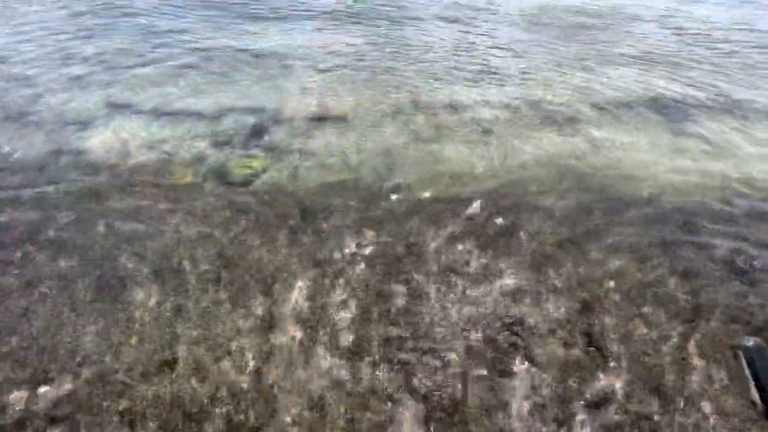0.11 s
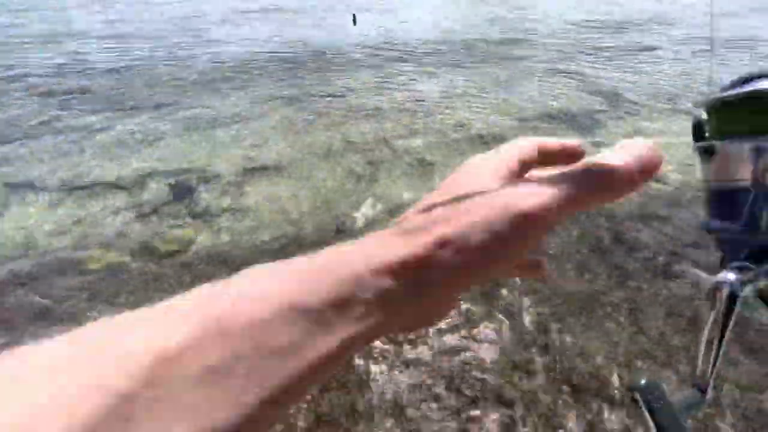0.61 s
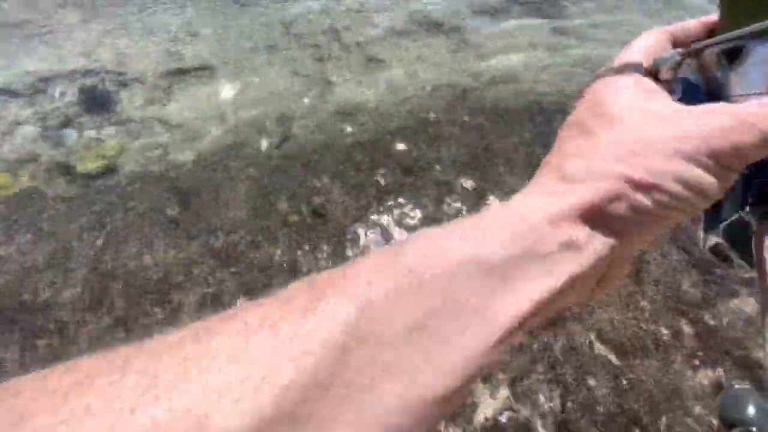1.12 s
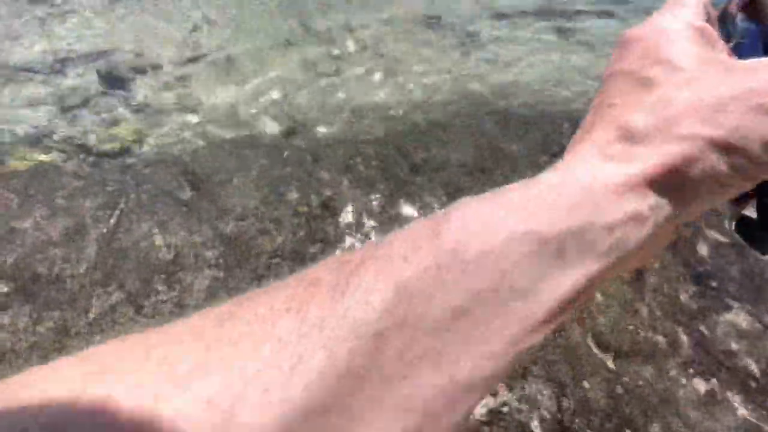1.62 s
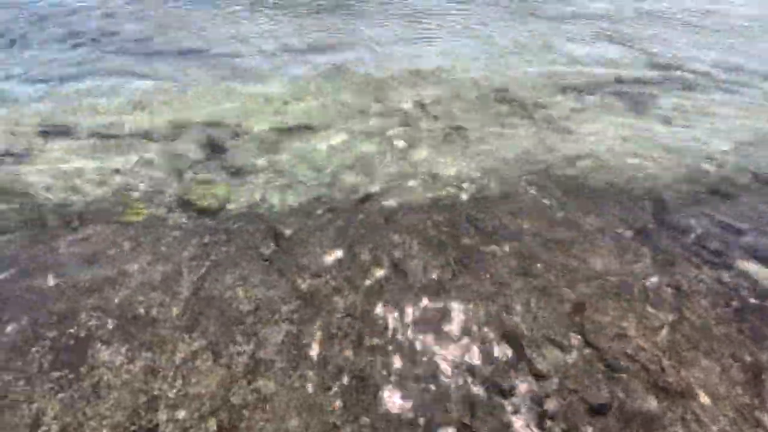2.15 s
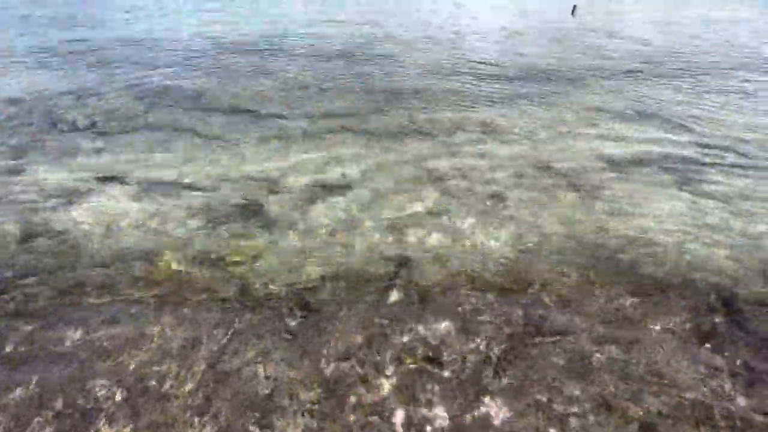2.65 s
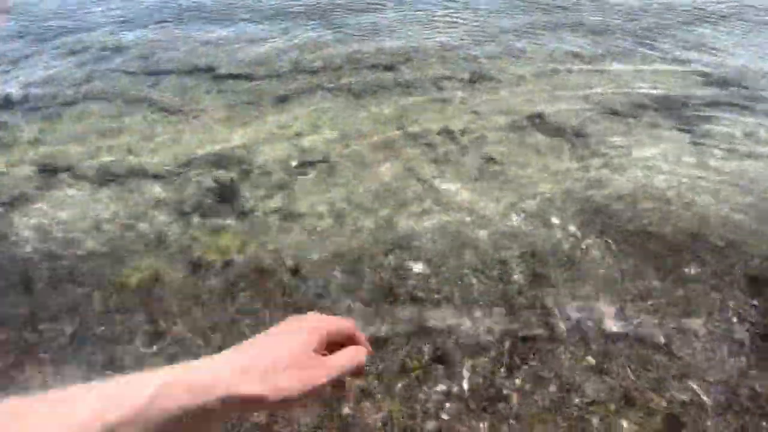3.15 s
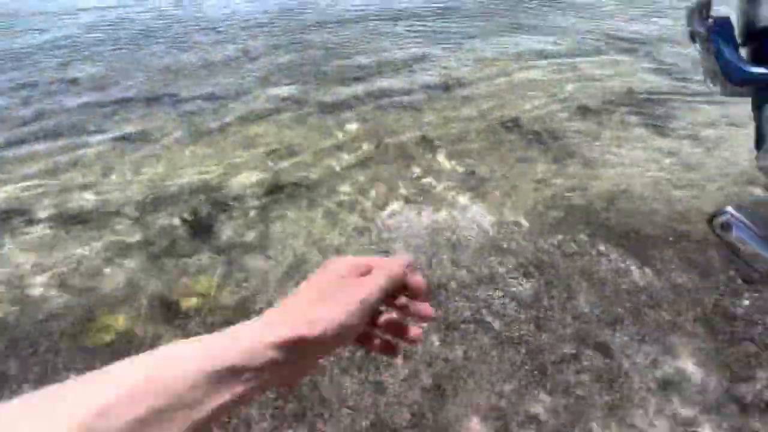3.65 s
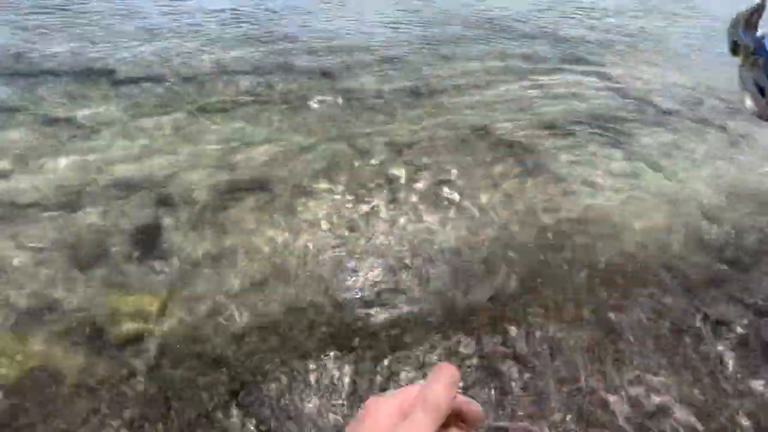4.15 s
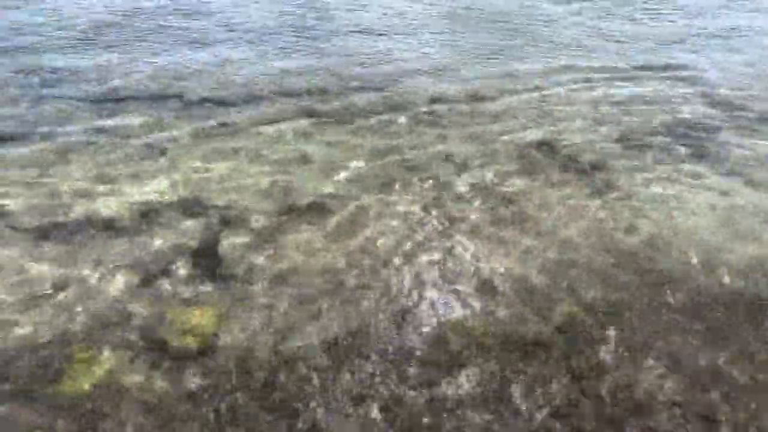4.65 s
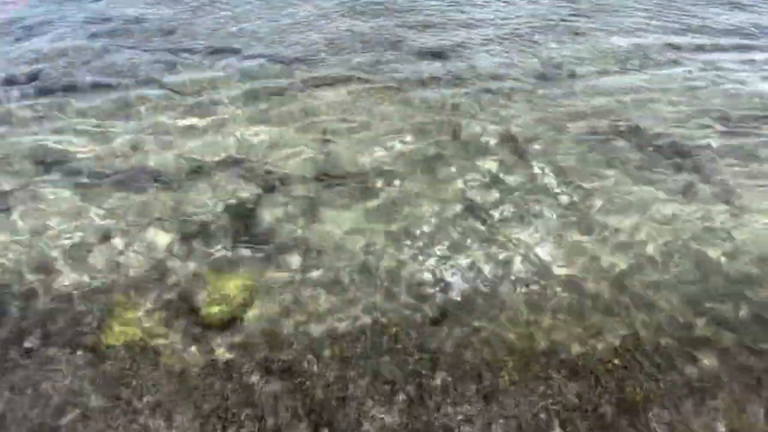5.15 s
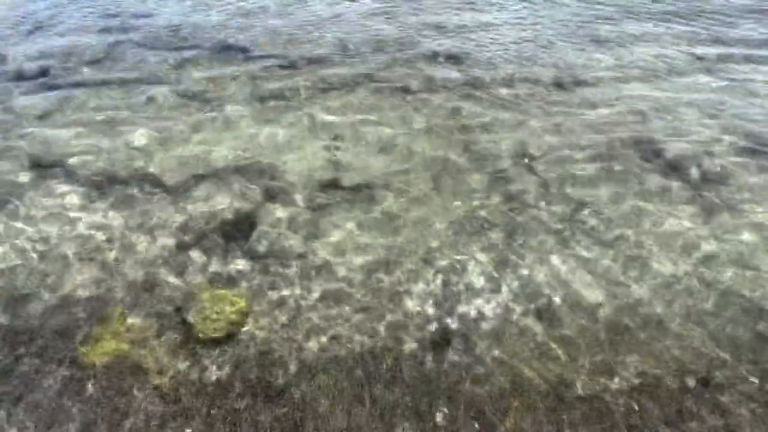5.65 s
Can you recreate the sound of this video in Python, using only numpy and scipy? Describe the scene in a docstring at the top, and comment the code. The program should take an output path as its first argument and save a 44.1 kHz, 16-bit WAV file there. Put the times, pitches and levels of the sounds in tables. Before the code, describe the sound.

Someone wades over rocks: a brief splash, a lull of smooth wash, then stronger bubbly sloshes with low wind buffeting.

```python
"""A shallow, rocky seashore: feet wade through the water, heard by a small two-port microphone.
The water gurgles and fizzes (swarms of ringing bubbles over shaped hiss), traps pockets of air
(gliding sines) and flings drops (puffs of noise). Small surf washes further out (smooth hiss),
and gusts buffet the ports (lumpy low noise, a wandering moan and a few falling thumps)."""
import sys
import numpy as np
from scipy import signal
from scipy.fft import rfft, irfft, next_fast_len
from scipy.io import wavfile
from scipy.ndimage import uniform_filter1d

SR = 44100
rng = np.random.default_rng(int(sys.argv[2]) if len(sys.argv) > 2 else 0)


def digitize_waveform(pressure):
    """Quantize a signal to 16-bit integers and store it at the path in sys.argv[1].

    Rows of a 2-D input are taken as channels; values are limited to [-1, 1].
    """
    field = np.atleast_2d(pressure).T
    bounded = np.clip(field, -1, 1)
    quanta = np.round(bounded * 32767).astype(np.int16)
    wavfile.write(sys.argv[1], SR, quanta)


def invert_db(level):
    """Linear amplitude ratio for a level in decibels (20 dB per decade), elementwise."""
    return 10 ** (np.asarray(level, dtype=float) / 20)


N = 254589  # length in samples


def evened(x):
    """Scales to rms 1."""
    return x / np.sqrt(np.mean(x ** 2) + 1e-20)


def read(points, hz, axis=1):
    """Reads a column of a table on a log-frequency axis."""
    table = np.transpose(points)
    return np.interp(np.log(hz + 1), np.log(table[0] + 1), table[axis])


def follow(points, axis=1):
    """One column of a curve over time, read at every sample."""
    table = np.transpose(points)
    return np.interp(np.arange(N) / SR, table[0], table[axis])


def add(mix, s, sound):
    """Mixes a sound in at s seconds."""
    part = mix[round(s * SR):][:len(sound)]
    part += sound[:len(part)]


def coloured(x, spectrum):
    """Whitens roughly and imposes a spectrum."""
    z, hz = rfft(x), np.fft.rfftfreq(N, 1 / SR)
    own = np.sqrt(uniform_filter1d((abs(z) ** 2).mean(0), size=1500) + 1e-12)
    return evened(irfft(z / own * invert_db(read(spectrum, hz)), N))


def mixed(left, right, same):
    """Gives the right port a share of what the left one hears."""
    same = np.clip(same, -1, 1)
    return np.array([left, same * left + np.sqrt(1 - same ** 2) * right])


def hiss(spectrum, patchy_db, flicker_db, same=((1, 0), (2, 0)), size=512):
    """Random short-time spectra with drifting patches and a flicker shared by all bins."""
    frames, hz = 4 * N // size + 5, np.fft.rfftfreq(size, 1 / SR)
    a, b, c, d, patches = rng.standard_normal((frames, len(hz), 5)).T
    flicker = evened(uniform_filter1d(patches[0], size=5))
    patches = uniform_filter1d(patches, size=6, axis=0)
    patches = evened(uniform_filter1d(patches, size=10, axis=1))
    z = mixed(a + 1j * b, c + 1j * d, read(same, hz)[:, None])
    z *= invert_db(read(spectrum, hz)[:, None] + patchy_db * patches + flicker_db * flicker)
    sound = signal.istft(z, nperseg=size, noverlap=3 * size // 4)[1]
    return evened(sound[:, :N])


def band(hz, width_hz):
    """A narrow, fuzzy tone of noise that follows a pitch curve."""
    turns = np.cumsum(hz) / SR
    r = np.exp(-np.pi * width_hz / SR)
    a, b = signal.lfilter([1], np.convolve([1, -r], [1, -r]), rng.standard_normal((2, N)))
    return evened(a * np.cos(2 * np.pi * turns) + b * np.sin(2 * np.pi * turns))


def bubble(hz, cycles, rise, swell):
    """A bubble swells for some cycles, then loses 60 dB over `cycles` while its pitch glides."""
    turn = np.arange(int((cycles + swell) * SR / hz) + 8) * hz / SR
    size = np.minimum(turn / swell, 1) ** 2 * invert_db(-60 * np.maximum(turn - swell, 0) / cycles)
    return size * np.sin(2 * np.pi * (turn + rise * turn ** 2 / cycles))


def scattered(x, wet_db, t60):
    """Rocks, legs and ripples send each port its own short reflections."""
    t = np.arange(2000) / SR
    sparse = rng.random((2, 2000)) < .06
    taps = rng.standard_normal((2, 2000)) * sparse * invert_db(-60 * t / t60)
    taps *= invert_db(wet_db) / np.linalg.norm(taps, axis=1)[:, None]
    taps[:, 0] = 1  # direct sound
    return signal.oaconvolve(x[None], taps, axes=1)[:, :N]


def swarm(low_hz, high_hz, cycles, per_s, spread_db, rise, swell, count=20):
    """Bubbles of many sizes in clumps; a few are loud, some glide down, every other size dies fast."""
    clump_db = 3  # how much the bubble rate comes and goes
    clumps = invert_db(clump_db * evened(uniform_filter1d(rng.standard_normal(N), size=900)))
    loudness = invert_db(spread_db * np.minimum(rng.exponential(1, N), 4))
    starts = loudness * (rng.random(N) < clumps * per_s / SR)
    kind, out = rng.integers(0, count, N), np.zeros(N)
    for k, hz in enumerate(np.geomspace(low_hz, high_hz, count)):
        haste = 1 + k % 2
        ring = bubble(hz, cycles / haste, rise * (k % 3 - .5), swell / haste)
        out += signal.oaconvolve(starts * (kind == k), ring)[:N]
    return out


# water pushed around legs and rocks: (crest t/s, length t/s, strength level/dB,
# large bubbles level/dB and spray level/dB, both above that strength)
SLOSHES = [(.08, 0.98, -41.5, -11, -2.5), (.33, 0.75, -42.5, 1, 5.5), (.47, 0.18, -39, -16, 0),
           (2.16, 0.32, -44, 3, -14), (2.36, 1, -47, -14, -8), (2.8, 5.8, -51.5, -17, 4),
           (3.06, 1.53, -41.5, 3, 5.5), (3.251, 1.92, -40.5, 12, 9.5), (3.46, 1.35, -31.5, -3.5, 0.5),
           (4.332, 1.2, -45.5, 6, 2), (4.499, 0.52, -41, 2.5, 4.5), (4.63, 0.91, -34, -27, 2.5),
           (4.78, 1.6, -29.5, -5, -3), (5.1, 1.9, -41.5, 0, 6), (5.52, 1.4, -37.5, -3, -22)]


def stirring():
    """Gains of large bubbles, small bubbles and spray: sloshes swell and drain over still water."""
    rise_share, drain_db = 0.24, -32.5  # build-up scale as a share of the length; drain over one length
    still_large_db, still_small_db, still_spray_db = -54, -67, -54.5  # lapping between sloshes
    t = np.arange(0, N + 64, 64) / SR
    crest, length, db, large_db, spray_db = np.transpose(SLOSHES)[:, :, None]
    build = ((crest - t) / (rise_share * length)) ** 2
    drain = (t - crest) / length
    shape_db = db + drain_db * np.where(t < crest, build, drain)
    gains = []
    for up_db, still_db in [(large_db, still_large_db), (0, still_small_db), (spray_db, still_spray_db)]:
        power = (invert_db(shape_db + up_db) ** 2).sum(0) + invert_db(still_db) ** 2
        gains.append(np.interp(np.arange(N) / SR, t, np.sqrt(power)))
    return gains


# spectrum of the large bubbles: (f/Hz, level/dB per Hz)
LARGE = [(120, -56), (250, -5.5), (400, 0.5), (800, 5.5), (1100, -2), (1600, -26)]
# spectrum of the small bubbles: (f/Hz, level/dB per Hz)
SMALL = [(600, -7.5), (1000, -1), (1280, 0), (1550, -3), (2000, -5.5), (2700, -10), (4000, -24.5)]


def gurgle(large_gain, small_gain):
    """Large and small bubbles ring, each kind over a rush of moving water."""
    large = swarm(low_hz=260, high_hz=1200, cycles=45., per_s=700., spread_db=2.4, rise=.45, swell=5.)
    large = coloured(scattered(large, wet_db=3, t60=0.023), LARGE)
    large += invert_db(-11) * hiss(LARGE, patchy_db=2.0, flicker_db=2.1, size=1024)
    small = swarm(low_hz=900, high_hz=3182, cycles=21.5, per_s=800., spread_db=2.5, rise=0.16, swell=9.)
    small = coloured(scattered(small, wet_db=5.5, t60=0.052), SMALL)
    small += invert_db(-2) * hiss(SMALL, patchy_db=-1.5, flicker_db=2.5)
    return large_gain * large + small_gain * small


# trapped pockets of air that ring while they change size, and (row at 4.707 s) a low tone sliding down as the
# gust swells: # (start t/s, length t/s, first f/Hz, last f/Hz, level/dB)
POCKETS = [(3.045, 0.032, 303, 299, -29.5), (3.089, 0.052, 470, 312, -27.5), (3.148, 0.05, 323, 424, -32),
           (3.238, 0.026, 391, 326, -29), (4.475, 0.041, 414, 612, -30.5), (4.707, 0.035, 320, 221, -26.5),
           (3.374, 0.07, 508, 320, -27.5)]


def pockets(waver):
    """A squeezed air pocket rings higher and louder, and fades as it rings."""
    fade_db, edge_s, db_per_octave = -3, .005, 6
    out = np.zeros(N)
    for s, length, first_hz, last_hz, db in POCKETS:
        t = np.arange(0, length, 1 / SR)
        hz = first_hz * (last_hz / first_hz) ** (np.sin(np.pi / 2 * t / length) ** 2)
        level_db = db + fade_db * t / length + db_per_octave * np.log2(hz / max(first_hz, last_hz))
        edges = np.clip(np.minimum(t, length - t) / edge_s, 0, 1)
        ring = np.sin(2 * np.pi * np.cumsum(hz * waver[round(s * SR):][:len(t)]) / SR)
        add(out, s, invert_db(level_db) * edges * ring)
    return out


# long gulps, one curve each: (t/s, f/Hz, level/dB)
GULPS = [
    [(2.857, 299, -54), (2.863, 292, -21), (2.878, 309, -19.5), (2.913, 375, -24.5), (2.927, 316, -33),
     (2.945, 321, -33), (2.973, 433, -35), (2.995, 523, -32), (3.01, 533, -51)],
    [(2.126, 637, -48), (2.132, 696, -32), (2.141, 850, -31.5), (2.156, 790, -46), (2.168, 674, -31),
     (2.183, 845, -41), (2.192, 900, -30)],
    [(3.255, 210, -40), (3.27, 221, -34), (3.315, 360, -30.5), (3.338, 520, -26.5), (3.35, 550, -40)],
]


def gulps(waver):
    """A cavity opens and closes without a break, so one tone slides in pitch and level."""
    out = np.zeros(N)
    for gulp in GULPS:
        t = follow(gulp, axis=0)  # held at the ends, outside the gulp
        heard = (t > gulp[0][0]) & (t < gulp[-1][0])
        tone = np.sin(2 * np.pi * np.cumsum(follow(gulp) * waver) / SR)
        out += heard * invert_db(follow(gulp, axis=2)) * tone
    return out


# single bubbles: (t/s, level/dB, starting f/Hz)
BUBBLES = [(0.064, -36, 1170), (0.066, -36, 830), (0.08, -32, 800), (0.108, -32, 750), (0.128, -33.5, 730),
           (0.24, -29.5, 2160), (0.291, -30, 2020), (0.33, -27.5, 1820), (0.32, -30, 1680),
           (0.423, -23, 1850), (0.433, -26, 1680), (0.487, -28, 1540), (0.54, -29.5, 1730),
           (1.832, -33.5, 604), (2.13, -32, 1870), (2.106, -33, 1880), (2.159, -29, 1060),
           (2.165, -34, 1730), (2.18, -32, 1320), (2.22, -31.5, 670), (2.351, -33, 1870),
           (2.363, -31.5, 1920), (2.413, -33, 784), (2.971, -26.5, 1285), (3.024, -18.5, 824),
           (3.082, -18, 647), (3.1, -23, 900), (3.151, -28, 1010), (3.208, -29, 860), (3.226, -44, 596),
           (3.275, -29, 670), (3.314, -23.5, 710), (3.365, -28, 1100), (3.444, -21, 542), (3.45, -19, 755),
           (3.555, -24, 1620), (3.631, -24.5, 1140), (3.701, -31, 853), (3.812, -24.5, 1106),
           (3.88, -33, 650), (3.93, -29, 1253), (3.986, -34, 1240), (4.266, -28, 1190), (4.302, -27, 1694),
           (4.483, -24, 890), (4.585, -17.5, 1850), (4.628, -25, 1150), (4.586, -24, 790),
           (4.67, -13.5, 1270), (4.6752, -17.5, 1274), (4.713, -31, 1270), (4.818, -26, 1280),
           (4.928, -27, 1270), (5.099, -21, 1224), (5.225, -41, 1200), (5.252, -27.5, 1320),
           (5.378, -29, 1830), (5.474, -23, 900), (5.501, -23, 1200), (5.514, -17, 1250),
           (5.575, -32.5, 1750), (5.62, -27.5, 1860), (5.646, -25, 610)]


def single_bubbles():
    """Each bubble swells fast and rings down while its pitch climbs slightly."""
    out = np.zeros(N)
    for s, db, hz in BUBBLES:
        add(out, s - 1 / hz, invert_db(db) * bubble(hz, cycles=48., rise=.06, swell=1.6))  # one cycle early
    return out


def plops():
    """Air pockets, gulps and single bubbles, with their reflections off the surroundings."""
    waver = 1 + 0.029 * evened(uniform_filter1d(rng.standard_normal(N), size=300))  # the wall shakes
    close = scattered(pockets(waver) + gulps(waver), wet_db=-10, t60=.02)
    return close + scattered(single_bubbles(), wet_db=-11, t60=.03)


# spectrum of the spray, and of the wide crack in each splat: (f/Hz, level/dB per Hz)
SPRAY = [(1200, 1.5), (2200, -3.5), (3000, -2.5), (5300, -1.5), (9000, -8), (11000, -2.5), (12000, 1.5)]


def spray(gain):
    """Tiny bursting bubbles and droplets over fine hiss."""
    grains = swarm(low_hz=2000, high_hz=12500, cycles=35., per_s=2500., spread_db=4.2, rise=.06,
                   swell=14., count=40)
    grains = coloured(scattered(grains, wet_db=5., t60=0.014), SPRAY)
    return gain * (grains + invert_db(0.6) * hiss(SPRAY, patchy_db=2.0, flicker_db=1.0, size=256))


# flung drops landing: (t/s, level/dB, centre f/Hz)
SPLATS = [(0.104, -25.5, 5100), (0.25, -26, 3000), (0.345, -24.5, 2210), (0.3216, -18, 4000),
          (0.3313, -18.5, 3470), (0.4325, -16, 2360), (0.434, -32, 450), (1.7958, -31.5, 4800),
          (2.132, -34, 2100), (2.15, -28, 3280), (2.203, -31, 7000), (2.338, -28, 2970),
          (2.3463, -31, 11500), (2.362, -25.5, 11800), (2.377, -27.5, 11100), (2.64, -31, 6600),
          (2.8362, -30, 5800), (2.97, -22, 4020), (3.097, -23, 3820), (3.249, -16.5, 11300),
          (3.4112, -17, 8800), (3.429, -12.5, 5500), (3.6666, -18.5, 3040), (3.708, -19.5, 3320),
          (3.8272, -17.5, 3450), (3.912, -30, 9100), (4.043, -28.5, 8810), (4.2924, -26, 2960),
          (4.43, -26, 4780), (4.583, -8.5, 11000), (4.6683, -13, 1700), (4.692, -20, 2900),
          (4.837, -18.5, 6270), (5.445, -24.5, 6650), (5.5728, -25.5, 3600)]


def splats():
    """Each drop is a puff of noise, strongest near its own pitch, with a wide crack."""
    out, puffs = np.zeros(N), rng.standard_normal((len(SPLATS), 3000))
    t, hz = np.arange(3000) / SR, np.fft.rfftfreq(3000, 1 / SR)
    bell = np.exp(-((t - .005) / 0.004) ** 2)  # a soft, symmetric swell and fall of a few ms
    crack = invert_db(-3.5 + read(SPRAY, hz))
    for (s, db, centre_hz), puff in zip(SPLATS, puffs):
        shape = np.exp(-(np.log((hz + 1) / centre_hz) / 0.15) ** 2) + crack
        burst = evened(irfft(rfft(puff) * shape)) / 3  # peaks near 3 x rms
        add(out, s - .0025, invert_db(db) * bell * burst)
    return scattered(out, wet_db=-2, t60=.03)


# loudness of the waves further out: (t/s, level/dB)
WAVES = [(0, -41), (.3, -38), (.8, -33.5), (2, -35.5), (2.75, -36), (3.5, -33), (4.1, -38.5), (4.4, -33.5),
         (5, -30), (5.77, -32)]
# spectrum of the surf: (f/Hz, level/dB per Hz)
SURF = [(60, -5.5), (350, -3), (700, 3), (1150, -2.5), (2000, -12.5), (3000, -22.5), (5000, -27),
        (11000, -43.5)]
# likeness of the ports in the surf, negative in antiphase: (f/Hz, share [-1..1])
SURF_SAME = [(200, 0.76), (350, -0.14), (600, -0.64), (1200, -0.97), (1600, -0.48), (2000, 0.76),
             (2700, -0.4)]


def surf():
    """Far, smooth wash of small waves."""
    return invert_db(follow(WAVES)) * hiss(SURF, patchy_db=2.0, flicker_db=1.06, same=SURF_SAME)


# eddies that pop on the left port and fall in pitch:
# (t/s, level/dB, start f/Hz, end f/Hz, 60 dB decay t/s)
THUMPS = [(2.065, -15, 387, 111, 0.069), (2.076, -11, 70, 62.6, 0.16), (2.102, -12.5, 304, 79.4, 0.1)]


def thumps():
    """An eddy pops as a decaying sine whose pitch drops at once."""
    out = np.zeros(N)
    for s, db, start_hz, end_hz, t60 in THUMPS:
        t = np.arange(int(t60 * SR)) / SR
        hz = end_hz + (start_hz - end_hz) * np.exp(-t / 0.0078)
        level = invert_db(db - 60 * t / t60) * np.minimum(t / 0.0048, 1)
        add(out, s, level * np.sin(2 * np.pi * np.cumsum(hz) / SR))
    return out


# wind at the ports, which go from alike to antiphase as it veers: (t/s, level/dB, likeness [-1..1])
GUSTS = [(0, -45, 0.2), (.3, -59, 0.66), (.42, -40.5, 0.36), (.85, -36.5, -0.11), (1.15, -41.5, 0.61),
         (1.9, -43, 0.62), (2.08, -36, 0.7), (2.19, -34, 0.091), (2.47, -41.5, 0.74), (2.65, -50.5, 0.59),
         (2.95, -43, 0.82), (3.6, -42, 0.92), (4.45, -38, 0.66), (4.55, -42, 0.52), (4.75, -28, -0.23),
         (4.95, -32, 0.00039), (5.35, -45, -0.031), (5.66, -35.5, -0.6), (5.77, -23.5, -0.65)]
# spectrum of the buffeting: (f/Hz, level/dB per Hz)
BUFFET = [(30, -27), (55, 15), (130, 9), (220, -2.5), (400, 0.5), (900, -25)]
# pitch of the moan: (t/s, f/Hz)
MOAN = [(0, 130), (1.3, 140.6), (2.1, 65.6), (2.9, 124.7), (3.6, 95), (4.35, 95.1), (4.8, 64.6),
        (5.77, 109)]


def wind():
    """Lumpy turbulence and a moan at the ports; a few eddies pop on the left one."""
    left, right = hiss(BUFFET, patchy_db=1.0, flicker_db=-1.0, size=2048)
    same = follow(GUSTS, axis=2)
    moan = invert_db(0.5) * band(follow(MOAN), width_hz=34.0)
    out = mixed(left, right, same) + np.maximum(same, 0) * moan  # the moan dies when the wind veers
    out *= invert_db(follow(GUSTS))
    out[0] += thumps()
    return out


def scene():
    """Everything that reaches the two ports."""
    large, small, fine = stirring()
    return gurgle(large, small) + plops() + spray(fine) + splats() + surf() + wind()


# the microphone's bass roll-off, then the top edge of what is heard: (f/Hz, level/dB)
EDGES = [(22, -50), (45, -3.5), (60, -2), (11200, 0), (11900, -11.5), (12500, -18), (13600, -46)]
# the two sides grow alike in the treble, in antiphase near 10 kHz:
# (f/Hz, likeness [0..1], right side's lead [turns])
TREBLE_TIE = [(8000, 0, -.15), (9000, .5, .07), (9500, .65, .36), (9700, .99, .5), (10300, .99, .5),
              (11000, .86, .68), (11650, .82, .9), (11750, .98, 1)]
# how much the housing dims the right port, up to the last frequency: (f/Hz, level/dB)
SHADE = [(40, 5), (220, 0.5), (900, 3), (2500, 2.5), (4200, 6), (5200, 10), (8000, 4.5), (8600, 7)]


def stereo_image(dry):
    """Bass and treble edges on both sides; the right is dimmed and, in the treble, tied to the left."""
    size = next_fast_len(N + SR)
    hz = np.fft.rfftfreq(size, 1 / SR)
    faded = dry * signal.windows.tukey(N, 400 / N)
    left, right = rfft(faded, size) * invert_db(read(EDGES, hz))
    same = read(TREBLE_TIE, hz)
    lead = np.exp(2j * np.pi * read(TREBLE_TIE, hz, axis=2))
    shade_db = read(SHADE, hz) * (hz < SHADE[-1][0])
    right = (same * lead * left + np.sqrt(1 - same ** 2) * right) / invert_db(shade_db)
    return irfft(np.array([left, right]), size)[:, :N]


def roll_off(x):
    """The treble ends steeply here."""
    return signal.sosfilt(signal.butter(12, 15780, fs=SR, output="sos"), x)


def record(dry):
    """Shapes the two sides into the finished mix."""
    mix = stereo_image(dry)
    return roll_off(mix)


dry = scene()
out = record(dry)
digitize_waveform(out)
```